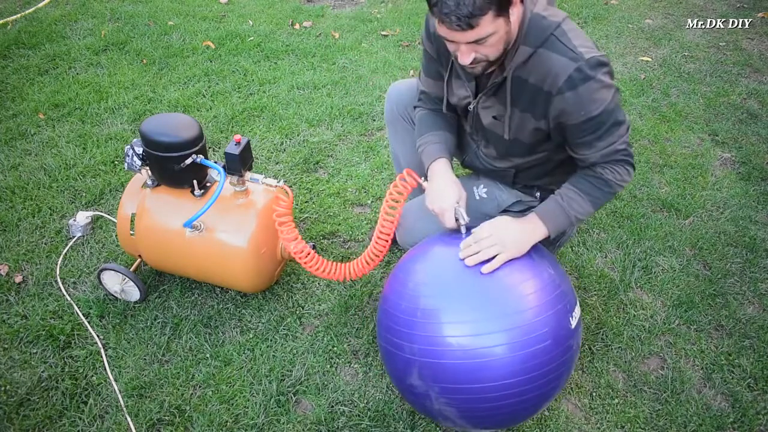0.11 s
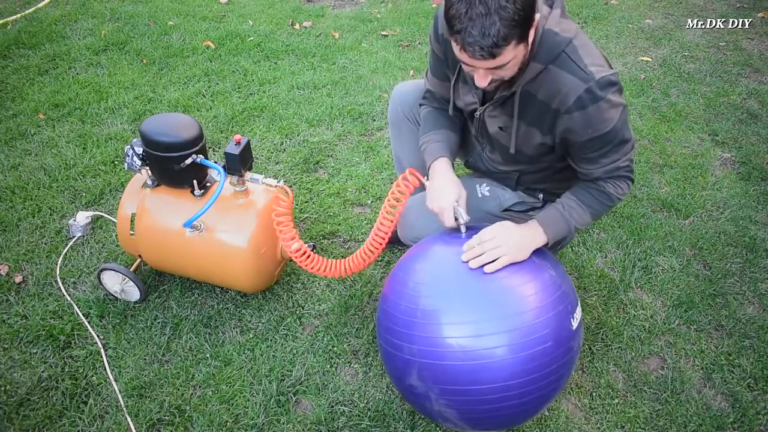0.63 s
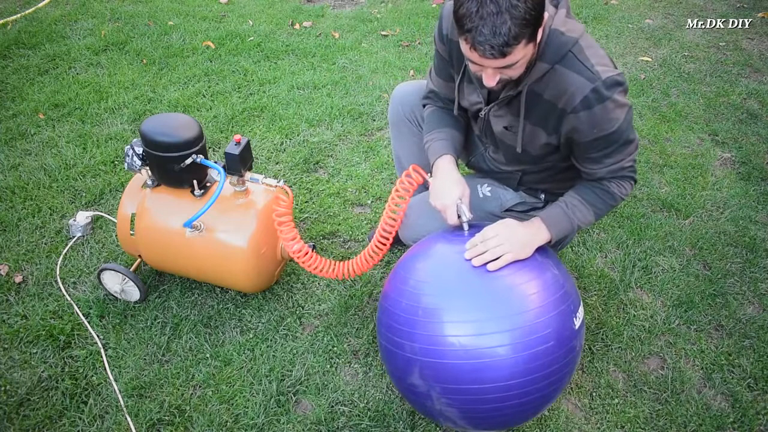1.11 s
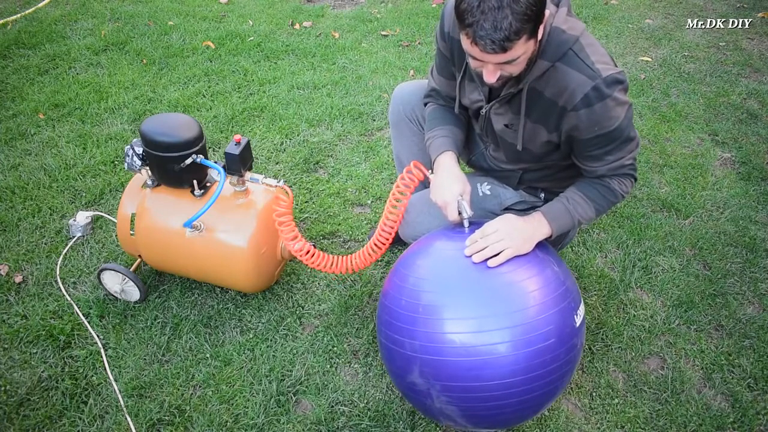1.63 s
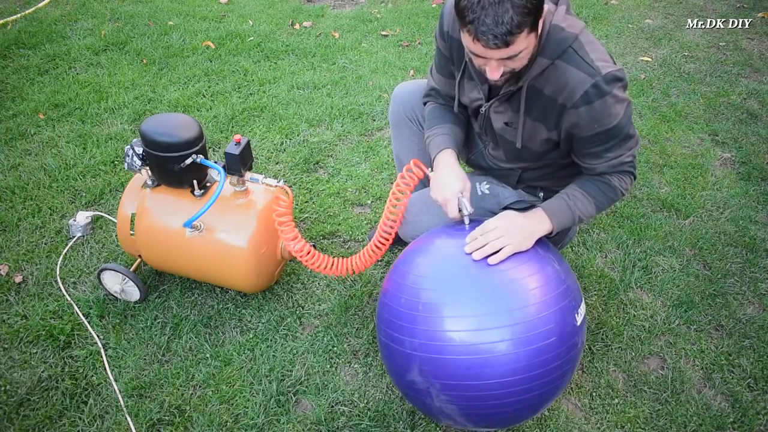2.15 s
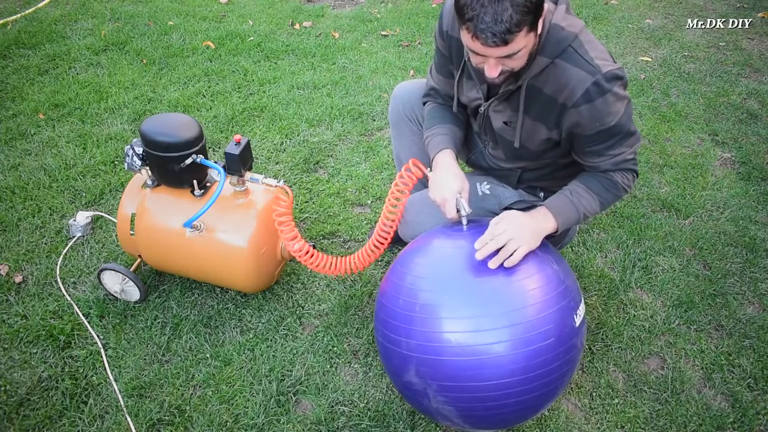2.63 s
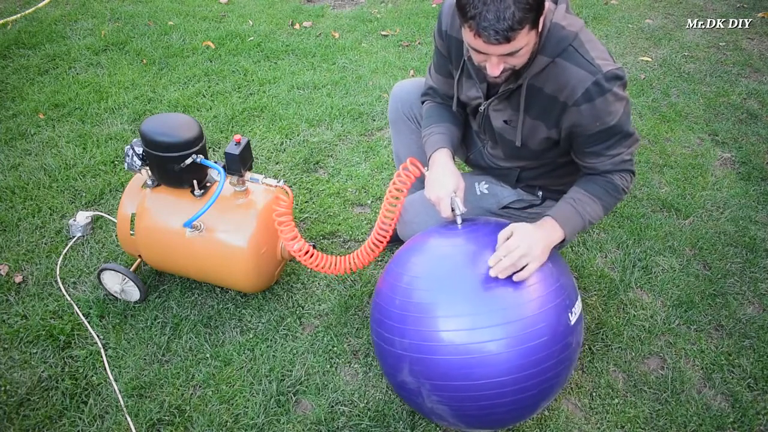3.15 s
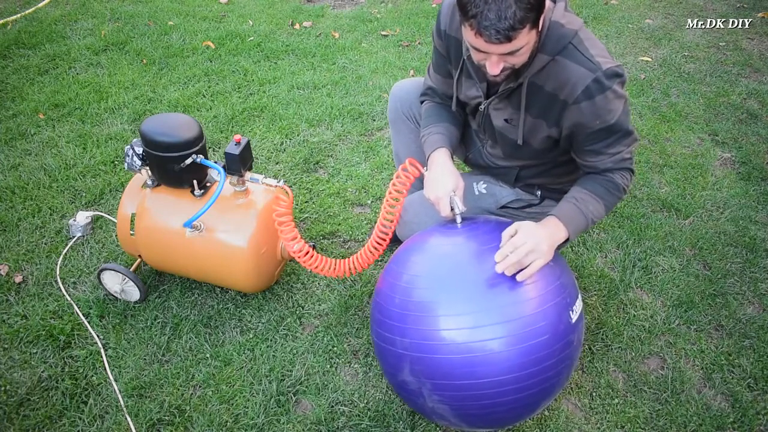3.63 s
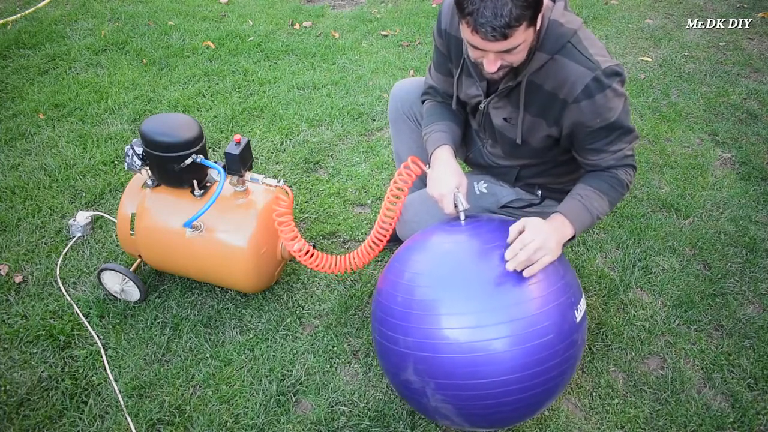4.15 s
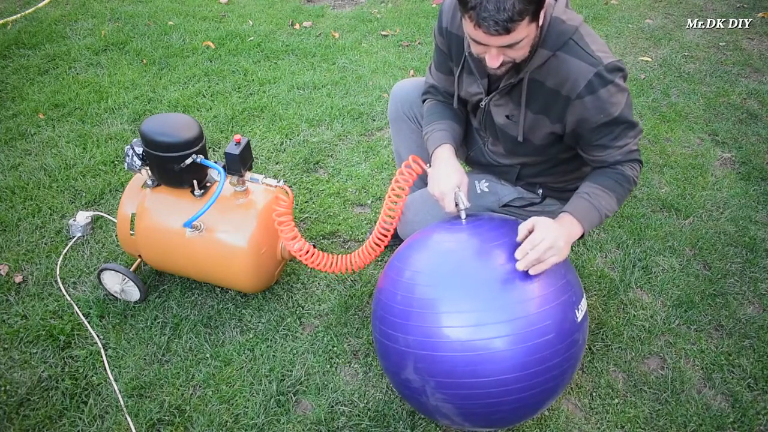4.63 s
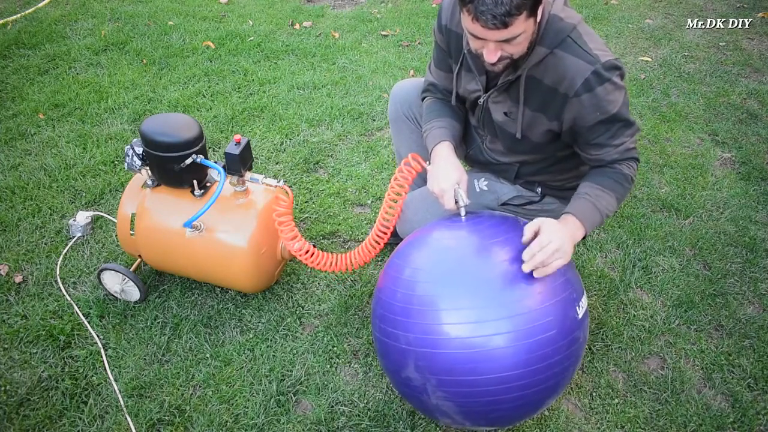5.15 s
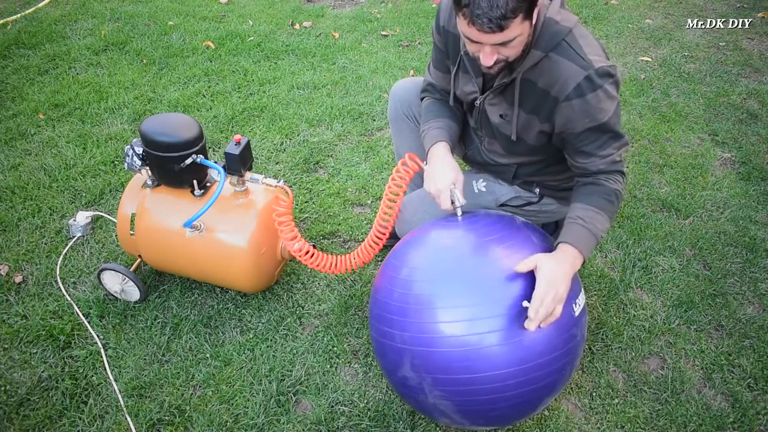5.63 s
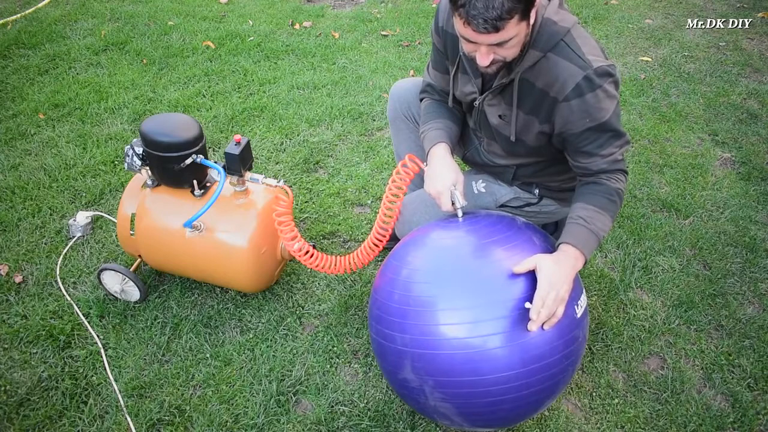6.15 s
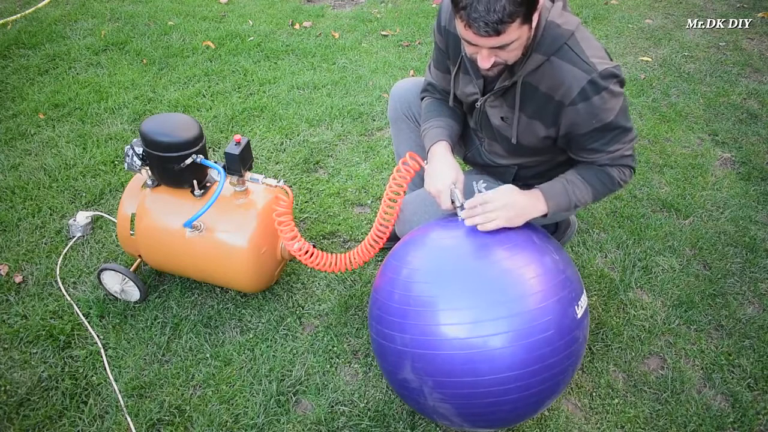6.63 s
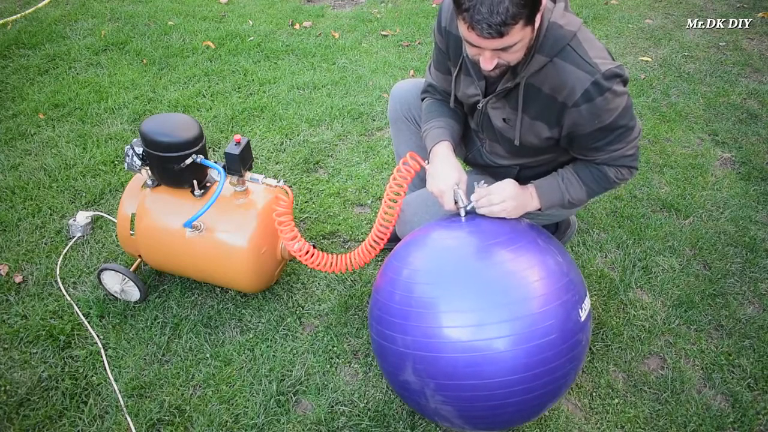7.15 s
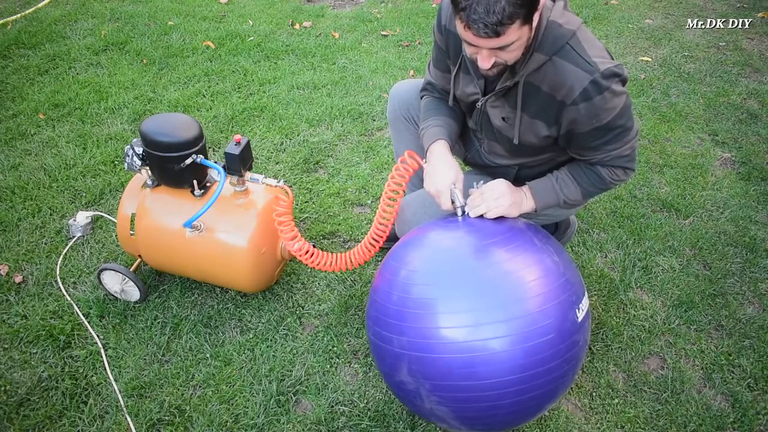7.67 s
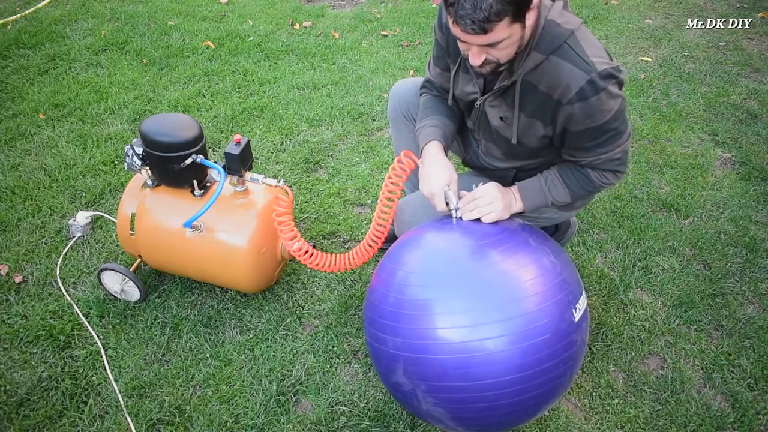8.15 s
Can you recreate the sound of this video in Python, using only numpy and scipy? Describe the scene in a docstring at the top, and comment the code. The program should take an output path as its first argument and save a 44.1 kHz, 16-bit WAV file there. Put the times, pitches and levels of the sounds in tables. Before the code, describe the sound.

A continuous airy rush with a ringing, slowly sinking colour fills a large ball outdoors, beside fast metallic compressor chatter, faint passing vehicle, light hand thumps.

```python
"""An air jet hisses into a large vinyl ball on a lawn: noise excites the air modes, which sink as the ball grows.
Beside it a small sealed compressor chatters once a turn, as bursts of noise ring its housing, and hums in tones.
In the distance a vehicle pulls away, then lifts off the throttle: firing tones, growl and tyre noise.
Filtered noise makes faint wind and far traffic; brief tones whistle in the ball; a hand pats it in damped sines."""
import sys
import numpy as np
from scipy import signal
from scipy.fft import rfft, irfft, next_fast_len
from scipy.io import wavfile
from scipy.ndimage import uniform_filter1d, map_coordinates

SR = 44100
rng = np.random.default_rng(int(sys.argv[2]) if len(sys.argv) > 2 else 0)


def unload_audio(sound):
    """Save the sound as a 16-bit wav file, at the path given as the first command line argument."""
    columns = np.transpose(np.atleast_2d(sound))
    # keep every value between -1 and 1, then stretch to whole-number steps
    steps = np.round(np.clip(columns, -1, 1) * 32767)
    wavfile.write(sys.argv[1], SR, steps.astype(np.int16))


def rack_gain(trim_db):
    """Turn a fader trim in dB into the linear factor to multiply a signal by."""
    fader = np.asarray(trim_db, float)
    return 10 ** (fader / 20)


N = 365148
T = np.arange(N) / SR


def curves(table):
    """Linear interpolation: the columns of a table joined by straight lines in time."""
    s, *columns = np.transpose(table)
    return [np.interp(T, s, column) for column in columns]


def unit(x):
    """Normalisation to a root-mean-square value of 1."""
    return x / np.sqrt(np.mean(x ** 2))


def coloured(points, gaps=(), size=N):
    """Spectral shaping: white noise weighted by (f/Hz, level/dB) points and narrow (f/Hz, width/Hz, dB) peaks or dips."""
    size_fft = next_fast_len(size)
    f = np.fft.rfftfreq(size_fft, 1 / SR) + 1
    hz, db = np.transpose(points)
    db = np.interp(np.log(f), np.log(hz), db, left=-90)
    for centre, width, peak_db in gaps:
        db = db + peak_db / (1 + (2 * (f - centre) / width) ** 2)
    spectrum = rfft(rng.standard_normal(size_fft)) * rack_gain(db)
    return irfft(spectrum, size_fft)[:size]


def ring(x, hz, width, order=1):
    """Simple resonance, gain 1 at its centre; a second pass deepens the valleys between modes."""
    b, a = signal.iirpeak(hz, hz / width, SR)
    return signal.sosfilt(np.tile(np.r_[b, a], (order, 1)), x)


def walk(rate, size=N):
    """Slow random modulation with spread near 1: random values, rate of them a second, joined by lines."""
    steps = int(size / SR * rate) + 2
    values = 1.32 * rng.standard_normal(steps)
    return np.interp(np.arange(size) / SR * rate, np.arange(steps), values)


def tones(turns, table, waver_db):
    """Harmonic synthesis: sines at multiples of a rotation's phase, each wavering in level."""
    total = 0
    for multiple, db in table:
        level = rack_gain(db + waver_db * walk(6))
        phase = 2 * np.pi * (multiple * turns + rng.random())
        total = total + level * np.sqrt(2) * np.sin(phase)
    return total


def ball():
    """Cavity resonance: jet noise drives the sphere's modes; scaling time shifts them all by one ratio."""
    # ball size: t/s, mode frequency relative to the full ball
    swell = [(0, 1.0782), (2, 1.0532), (4, 1.0316), (6, 1.0133), (8.28, .9965)]
    # jet, weakening as the ball pushes back: t/s, level/dB (before the treble tilt)
    jet = [(0, -42), (.7, -43), (8.28, -44.5)]
    # jet noise beside the low modes, and the merged high modes: f/Hz, relative level/dB per Hz
    spray = [(60, -63), (200, -32), (600, -19.5), (2000, -16.5), (3440, -24), (3510, -7), (4500, -5),
             (6600, -5.5), (7400, -8.5), (8500, -18), (11000, -23), (13000, -31.5), (15500, -40)]
    # air modes of the full ball: f/Hz
    mode_hz = [468, 699, 891, 1140, 1182, 1300, 1356, 1428, 1518, 1569, 1683, 1818, 1926, 1992, 2082, 2140,
               2190, 2343, 2409, 2450, 2643, 2712, 2765, 2847, 2985, 3032, 3115, 3249, 3339, 3392]
    # their shapes: width of each filter pass/Hz, relative level midway/dB, gain over the filling/dB
    mode_shapes = [(50, -13.5, -4), (39.2, -6.5, -4.5), (44, -3.5, -5), (24.6, -6, -2), (24.9, -1.5, -5.5),
                   (61, -11, 3), (30, -5.5, 1.5), (29.8, -4.5, -4), (18.6, -2, 7), (21.7, -6, 3),
                   (30.6, -4, -6.5), (24.5, -0.5, -2.5), (27, -3.5, 1), (30.2, -9, -1), (29, -2, -1),
                   (40, -9.5, -11), (39.4, -3.5, -2), (30, -0.5, 3), (46.4, -1.5, -3), (34.4, 0.5, 4.5),
                   (59.4, -1.5, 1), (24.3, -2, -0.5), (25.7, -2, -9.5), (55, -0.5, 1), (34.8, 0.5, -5.5),
                   (24.7, 1, 1), (65.4, -3, 10.5), (49, -5.5, -11), (50.3, -1.5, 2), (30, -7.5, 0)]
    # crowded high modes, peaks and the gaps between them: f/Hz
    crowd_hz = [3520, 3609, 3680, 3699, 3725, 3768, 3810, 3894, 4011, 4110, 4152, 4240, 4329, 4375, 4610,
                4677, 4870, 5100, 5365, 6270]
    # their shapes: width/Hz, height or depth/dB
    crowd_shapes = [(40, 5), (39.7, 1), (19.7, -13.5), (18, 14.5), (29.8, -7), (25.8, 6.5), (25, -11),
                    (24, 5.5), (30, 4), (39.8, -15), (24, 6), (30, 3.5), (25.9, 12), (51.3, -18), (40, -15),
                    (59.6, -3), (30, -6), (81, -7.5), (49.4, 2.5), (80, -14)]

    # sound is made for a full ball, then read at the pace of the size curve: smaller is faster, so higher
    place = np.cumsum(curves(swell)[0])
    size = int(place[-1]) + 4
    when = np.interp(np.arange(size), place, T)
    crowd = [(hz, *shape) for hz, shape in zip(crowd_hz, crowd_shapes)]
    air = coloured(spray, crowd, size=size)
    filled = np.arange(size) / size - .5
    for hz, (width, db, gained_db) in zip(mode_hz, mode_shapes):
        wobble_db = 0.86 * walk(1.51, size=size)
        mode = ring(rng.standard_normal(size), hz, width, order=2)
        air = air + rack_gain(db + gained_db * filled + wobble_db) * mode
    air = unit(map_coordinates(air + whistles(when), [place], order=5))

    # the treble above 5500 Hz starts 4 dB down and brightens by 0.62 dB a second
    treble = signal.sosfilt(signal.butter(2, 5500, "high", fs=SR, output="sos"), air)
    treble_db = -4 + 0.62 * T
    return rack_gain(curves(jet)[0]) * (air + (rack_gain(treble_db) - 1) * treble)


def compressor():
    """Slip beating: the rotor lags the mains field, so valve flutter and tick swell and sink; the motor hums."""
    # shaft: t/s, turns a second
    shaft = [(0, 49.15), (1.75, 49.22), (5, 49.22), (8.28, 49.255)]
    # the magnetic pull meets the valve stroke twice in each beat:
    # place in the beat (0-1), width (0-1), flutter swell/dB, tick swell/dB (both before each mode's share)
    slip_beat = [(.325, .085, 3.5, 8), (.72, .07, 1.5, 7.5)]
    mains_hz = 50.03

    turns = np.cumsum(curves(shaft)[0]) / SR
    beat = 2 * (mains_hz * T - turns)
    flutter_db = tick_db = 0
    for at, width, flutter_gain_db, tick_gain_db in slip_beat:
        distance = (beat - at + .5) % 1 - .5
        hump = np.exp(-.5 * (distance / width) ** 2)
        flutter_db = flutter_db + flutter_gain_db * hump
        tick_db = tick_db + tick_gain_db * hump
    return valve_flutter(turns, flutter_db) + valve_tick(turns, tick_db) + motor_hum(turns)


def valve_flutter(turns, beat_db):
    """Forced resonance: the fluttering valve rings the housing modes once a turn."""
    # slow level: t/s, level/dB (before the scatter of the strokes)
    slow_level = [(0, -47), (.5, -46.5), (1.1, -45.5), (1.8, -46), (2.02, -42.5), (2.12, -45.5),
                  (2.55, -43), (3.0, -45.5), (3.6, -46.5), (4.05, -43.5), (4.3, -47), (4.7, -44),
                  (4.9, -47.5), (5.1, -45), (5.7, -46.5), (6.1, -44), (6.65, -49.5), (6.9, -43.5),
                  (7.05, -50), (7.23, -43), (7.4, -46), (8.28, -44)]
    # how deeply the modes follow the beat: f/Hz, share
    follows = [(6800, 0.8), (8000, 1.2)]
    # housing modes: f/Hz
    mode_hz = [4769, 6200, 6587, 6824, 8086, 8135, 8246, 8423]
    # their shapes: width/Hz, relative level/dB, rise of the burst/turns
    modes = [(17.8, -5.5, 0.16), (60.6, -10.5, 0.18), (25, -6, 0.29), (29.8, -4.5, 0.17), (22.7, 3.5, 0.16),
             (58.6, -4.5, 0.05), (45.7, -3.5, 0.16), (70, -40, 0.1)]
    return chatter(turns, curves(slow_level)[0], beat_db, follows, mode_hz, modes,
                   stroke_scatter_db=1, mode_scatter_db=1.0, leak=0.02, snap=0.33)


def valve_tick(turns, beat_db):
    """Forced resonance: a brighter tick at each stroke, begun as the valve opens, rings higher housing modes."""
    # how deeply the modes follow the beat: f/Hz, share
    follows = [(9400, 0.43), (9900, 0.65), (10400, 1), (11100, 0.47)]
    # housing modes: f/Hz
    mode_hz = [8776, 9352, 9500, 9955, 10106, 10239, 10500, 11165, 11350, 12000, 12300, 12600, 13200, 13900,
               14900, 12500, 10800]
    # their shapes: width/Hz, relative level/dB, rise of the burst/turns
    modes = [(100, -4, 0.2), (80, 0, 0.12), (150, -5.5, 0.14), (35, -1.5, 0.19), (40, -5, 0.028),
             (70, -4, 0.049), (50, -9, 0.06), (110, -7.5, 0.13), (150, -14.5, 0.065), (150, -36, 0.18),
             (80, -19, 0.13), (100, -28, .15), (60, -39, .15), (60, -33, 0.14), (90, -37, .15),
             (3000, -32, .1), (500, -23, 0.09)]
    return chatter(turns, -52.5, beat_db, follows, mode_hz, modes,
                   stroke_scatter_db=1.16, mode_scatter_db=0.48, leak=.03, snap=0.37)


def chatter(turns, level_db, beat_db, follows, mode_hz, modes, stroke_scatter_db, mode_scatter_db, leak, snap):
    """Modal excitation: a burst of air noise a turn, its strength set as the valve opens, rings each mode."""
    valve_turn = .31  # place in the turn where the valve opens
    since, stroke = np.modf(turns - valve_turn + 1)
    stroke = stroke.astype(int)
    chance = rng.standard_normal((stroke[-1] + 1, len(modes) + 1))
    gust = rng.standard_normal(N)
    out = 0
    for k, (hz, (width, db, rise)) in enumerate(zip(mode_hz, modes)):
        # a sharp snap, then a swell of escaping air, over a steady leak
        swell = since / rise * np.exp(1 - since / rise)
        burst = unit(snap * np.exp(-since / 0.071) + swell + leak)
        share = np.interp(hz, *np.transpose(follows))
        push_db = mode_scatter_db * chance[stroke, k] + share * beat_db
        # neighbouring modes move in opposite senses
        out = out + (-1) ** k * rack_gain(db) * ring(burst * gust * rack_gain(push_db), hz, width)
    gain = rack_gain(level_db + stroke_scatter_db * chance[stroke, -1])
    return unit(out) * uniform_filter1d(gain, size=40)


def motor_hum(turns):
    """Harmonics of rotation: wavering multiples of the shaft rate, fading as the motor settles."""
    # hum: multiple of the shaft rate, mid level at 1.5 s/dB
    hum_tones = [(5, -82), (6, -88), (12, -69), (20, -78), (28, -76), (45, -72), (63, -70)]
    fade_db = -0.36 * (T - 1.5)
    return rack_gain(fade_db) * tones(turns, hum_tones, waver_db=0.7)


def vehicle():
    """Engine orders: firing multiples, booms at pipe resonance or rising load, half orders, and tyre noise."""
    # vehicle, before the closing fade: t/s, engine level/dB, load growl level/dB, road noise level/dB
    car = [(0, -72, -81, -58), (.6, -75.5, -91, -55), (1.35, -71.5, -83, -55), (1.7, -80, -76, -55),
           (1.88, -75, -62.5, -54), (2.1, -74, -63.5, -54.5), (2.27, -77, -70, -52.5),
           (2.5, -78, -74, -58.5), (2.85, -89, -95, -65)]
    # engine speed before its jitter: t/s, firing f/Hz
    revs = [(0, 70.5), (.5, 74.4), (1, 78), (1.3, 79.8), (1.7, 81.8), (2, 83.2), (2.25, 83), (2.35, 79),
            (2.5, 64), (2.7, 57), (2.9, 55)]
    # engine tones: multiple of firing, level relative to the engine/dB
    engine_tones = [(1, -5.5), (2, -8.5), (4, -19), (5, -4), (6, -2), (8, 4)]
    # load growl: multiple of firing, level relative to the growl/dB
    growl_tones = [(2, -13), (2.5, -12), (3, -12), (3.5, -5), (4, -17), (4.5, -13)]
    # tyre roar: f/Hz, relative level/dB per Hz
    road_spectrum = [(60, -36), (200, -8.5), (500, 1), (1100, 3), (1600, 7), (2700, -0.5), (4500, -12),
                     (7000, -33)]

    engine_db, growl_db, road_db = curves(car)
    firing = curves(revs)[0]
    turns = np.cumsum(firing * (1 + 0.0018 * walk(30.1))) / SR

    def pipe(multiple, hz, width, db):
        return rack_gain(db) / (1 + (2 * (multiple * firing - hz) / width) ** 2)

    third = pipe(3, hz=226, width=16.4, db=3.8)
    # one boom of the seventh multiple follows the engine, the other the load 0.12 s late
    late_load = rack_gain(np.interp(T - 0.12, T, growl_db))
    boom = rack_gain(engine_db) * pipe(7, hz=512, width=26, db=12)
    boom = boom + late_load * pipe(7, hz=582, width=12, db=1.5)

    sound = rack_gain(engine_db) * (tones(turns, engine_tones, 1.0) + third * tones(turns, [(3, 0)], 1.0))
    sound = sound + boom * tones(turns, [(7, 0)], 0.98)
    sound = sound + rack_gain(growl_db) * tones(turns, growl_tones, 1.5)
    sound = sound + rack_gain(road_db) * unit(coloured(road_spectrum))
    return sound * np.clip((3.0 - T) / 0.17, 0, 1)  # silent from 3.0 s


def wind():
    """Low-frequency turbulence: modulated noise puffs on the microphone over a far rumble of traffic."""
    # wind: t/s, mid level/dB (about which the puffs waver)
    wind_level = [(0, -101), (1.6, -98), (2.7, -98), (3.1, -94), (3.7, -91), (4.5, -93), (5.9, -99),
                  (8.28, -100)]
    # far traffic: t/s, level/dB
    traffic_level = [(3.1, -82), (6.0, -83.5), (6.8, -87), (8.28, -84)]
    puff_db = curves(wind_level)[0] + 2.5 * walk(5)
    puffs = rack_gain(puff_db) * unit(coloured([(18, -9), (40, -1), (60, 2), (120, -47)]))
    rumble = unit(coloured([(50, -2), (90, -2), (200, 5.0), (350, -4), (700, -24.5)]))
    return puffs + rack_gain(curves(traffic_level)[0]) * rumble


def whistles(when):
    """Mode locking: the jet locks onto one ball mode and sings a brief wavering tone."""
    # whistles: centre t/s, length between 1/e points/s, f/Hz in the full ball, relative mid level/dB
    singing = [(.485, .2, 1826, -25), (1.0, .5, 1522, -31), (2.4, .7, 1522, -26), (2.4, .6, 1824, -27),
               (3.3, 1.1, 1828, -29), (4.28, .2, 900, -28), (5.45, .5, 1826, -31), (6.38, .25, 1522, -26),
               (6.65, .3, 1826, -31), (6.9, .25, 1522, -27)]
    size = len(when)
    u = np.arange(size) / SR
    out = 0
    for s, length, hz, db in singing:
        drift = np.cumsum(2.57 * walk(12, size=size)) / SR
        level = rack_gain(db + 1.0 * walk(14, size=size))
        swell = np.exp(-(2 * (when - s) / length) ** 2) * level
        out = out + swell * np.sqrt(2) * np.sin(2 * np.pi * (hz * u + drift))
    return out


def pats():
    """Damped oscillation: each soft palm thump is a sine of the skin in a short rise and decay."""
    # hand on the ball: t/s, envelope peak level/dB, f/Hz, contact (time to the envelope peak)/s
    thumps = [(2.479, -68, 121, 0.005), (2.841, -69, 95, 0.005), (2.874, -76, 72.7, 0.005),
              (2.967, -61, 120, 0.0037), (4.4, -67, 124, 0.005), (5.459, -72, 150, 0.003),
              (6.161, -68, 95, 0.0053)]
    out = np.zeros(N)
    for s, db, hz, contact in thumps:
        u = np.clip(T - s, 0, 1)
        envelope = np.e * u / contact * np.exp(-u / contact)
        out += rack_gain(db) * envelope * np.sin(2 * np.pi * hz * u)
    return out


def scene():
    """Superposition: all sources add in the open air."""
    return (ball() + compressor() + vehicle() + wind() + pats())[None]


def roll_off(x):
    """The treble ends steeply here."""
    return signal.sosfilt(signal.butter(12, 15710, fs=SR, output="sos"), x)


def record(dry):
    """Point reception: a small mono microphone takes the summed sound as one channel."""
    return roll_off(dry)


dry = scene()
out = record(dry)
unload_audio(out)
```